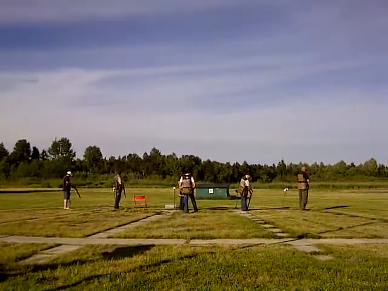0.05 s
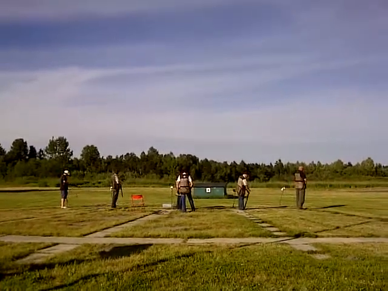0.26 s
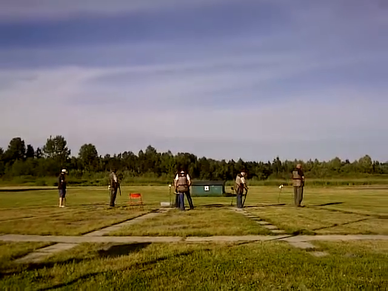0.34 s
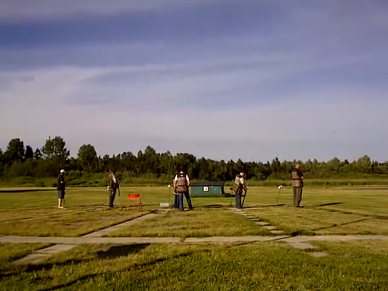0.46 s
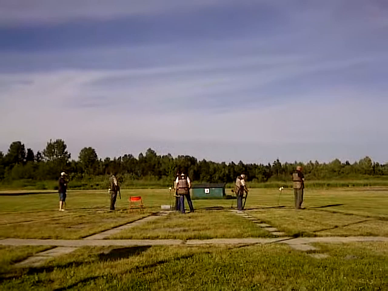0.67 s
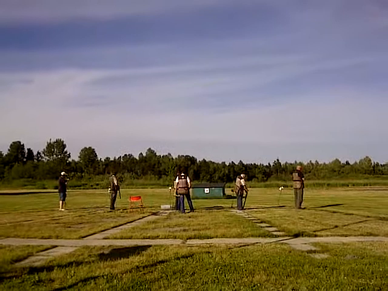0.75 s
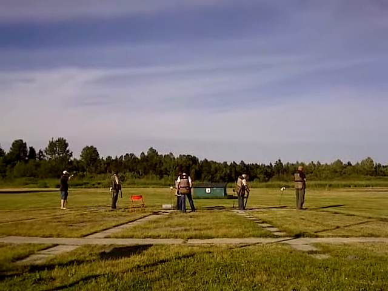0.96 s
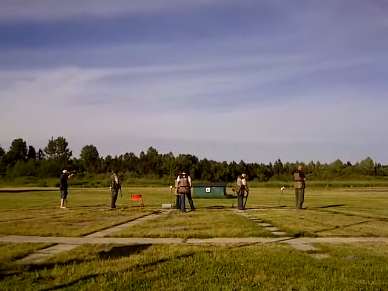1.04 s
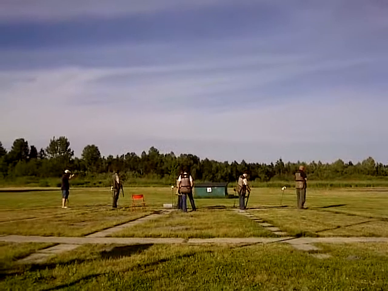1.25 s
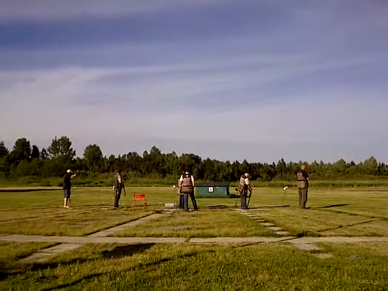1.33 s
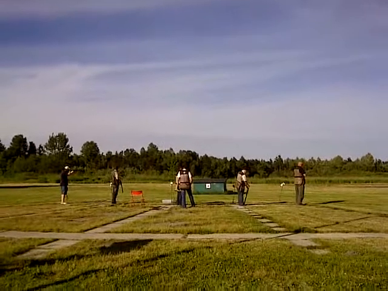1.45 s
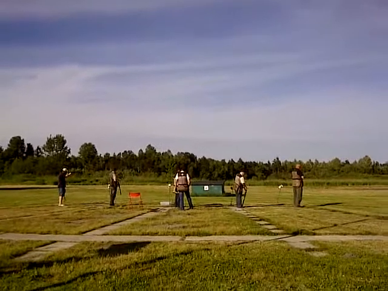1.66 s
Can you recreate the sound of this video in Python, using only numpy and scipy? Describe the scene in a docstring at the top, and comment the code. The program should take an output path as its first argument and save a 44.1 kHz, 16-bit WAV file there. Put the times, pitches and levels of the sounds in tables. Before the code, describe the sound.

One shotgun shot on an open outdoor range is the main sound. Light wind hisses throughout, with three small, dull knocks close by at about 0.2, 0.4 and 0.6 seconds. At 0.8 seconds the short, hard blast briefly overloads the microphone. A crackling echo rolls back from the field and trees, fading by about 1.5 seconds. A few more small knocks come between 1.3 and 1.6 seconds.

```python
"""One shotgun shot on an open, grassy range: a short, hard blast that overloads a small microphone.
Single surfaces return slaps; dense tiny echoes form a crackling roll, first from the field,
then from the tree line. A few small, damped knocks sound close by. Light wind hisses in the trees."""
import sys
import numpy as np
from scipy.fft import rfft, irfft
from scipy.io import wavfile
from scipy.ndimage import map_coordinates

SR = 44100
rng = np.random.default_rng(int(sys.argv[2]) if len(sys.argv) > 2 else 0)


def int16_out(signal):
    """Quantize to a 16-bit WAV file."""
    q = np.round(np.clip(np.atleast_2d(signal).T, -1, 1) * 32767)
    wavfile.write(sys.argv[1], SR, q.astype(np.int16))


N = 74970

# Muzzle blast spectrum. Each row: frequency in Hz, gain in dB.
BLAST_SPECTRUM = [(25, -7), (60, -17), (120, -3), (210, 2), (470, -5.5), (760, 3.5), (1030, -1),
                  (1340, 2.5), (1680, -10), (2050, -6), (2280, 1.5), (2500, 2), (2850, -18.5),
                  (3200, -14.5), (3650, -8), (4200, -15.5), (4650, -24.5), (5200, -10.5), (5800, -23),
                  (7800, -25.5), (9000, -37.5)]
# Paths via the ground and the stand. Each row: delay in seconds, gain in dB.
BOUNCE_PATHS = [(.00128, -15.5), (.0021, -19)]
# Single echoes. Each row: start in seconds, gain in dB, low-pass corner in Hz.
SLAPS = [(0.8196, -2, 8000), (0.828, 2, 4940), (.834, -1.5, 5000), (0.8524, 4.5, 3600), (.874, 4, 3200),
         (.891, 7, 4800), (.908, 5, 2480), (.951, 3, 4000), (1.004, 5.5, 2200), (1.021, 3.5, 3400),
         (1.058, 0.5, 4880), (1.0929, 1.5, 2500), (1.1717, 10, 1300), (1.296, 0.5, 1500)]
# Spectrum of a single echo. Each row: frequency in Hz, gain in dB.
SLAP_SPECTRUM = [(60, -26.5), (300, -13), (700, -4.5), (1250, 6), (1900, -17.5), (2520, -2), (3200, -15),
                 (5200, -20), (6900, -26.5), (7900, -60.5)]
# Field scatter envelope. Each row: time in seconds, level in dB.
FIELD_ENVELOPE = [(.809, -61.5), (.815, -40.5), (.832, -32.5), (.848, -46), (.872, -33.5), (.9, -33),
                  (.94, -34), (.995, -38), (1.015, -41), (1.05, -45), (1.2, -52.5)]
# Field scatter spectrum. Each row: frequency in Hz, gain in dB.
FIELD_SPECTRUM = [(100, -28), (300, -8), (528, -8), (667, -6.5), (879, -2.5), (1370, 0.5), (2010, -10.5),
                  (2540, -4.5), (3050, -15), (3600, -18.5), (4400, -26), (5100, -22), (6470, -31.5),
                  (7100, -35), (7800, -78.5)]
# Tree line scatter envelope, before air loss. Each row: time in seconds, level in dB.
TREE_ENVELOPE = [(1.045, -65.5), (1.058, -35), (1.085, -41.5), (1.1, -34), (1.15, -35), (1.22, -39.5),
                 (1.29, -37.5), (1.35, -37), (1.42, -43.5), (1.46, -40.5), (1.52, -50), (1.7, -53.5)]
# Tree line scatter spectrum. Each row: frequency in Hz, gain in dB.
TREE_SPECTRUM = [(50, -22), (125, -7.5), (280, -19), (420, -13), (711, -2.5), (842, -3), (1120, 0),
                 (1970, -9.5), (2440, -4.5), (3010, -17.5), (5340, -23.5), (6800, -37.5), (7700, -74.5)]
# Ground roll envelope. Each row: time in seconds, level in dB.
ROLL_ENVELOPE = [(.81, -61.5), (.818, -47.5), (.845, -46.5), (.856, -34.5), (.885, -39), (.915, -37),
                 (.95, -40.5), (.975, -31.5), (1.0, -45), (1.06, -54.5), (1.2, -58.5), (1.7, -63.5)]
# Ground roll spectrum. Each row: frequency in Hz, gain in dB.
ROLL_SPECTRUM = [(30, -46.5), (55, -21.5), (90, -4.5), (140, 6.5), (220, 4.5), (340, -5.5), (500, -24),
                 (1000, -68)]
# Close knocks. Each row: start in seconds, gain in dB, pitch in Hz, rise and T60 in seconds,
# overtone, thud and click gains in dB, click centre in Hz.
CLOSE_KNOCKS = [(.2167, -13, 367, 0.00016, .015, -6, -16.5, -18.5, 1900),
                (0.38, -49.5, 1300, 0.0012, .005, -10, -26, 6, 4900),
                (.4160, -3, 660, 0.0011, 0.012, -28, -23, -26, 3230),
                (0.4218, -27, 1220, 0.00069, 0.012, -10, -33, -7.5, 4900),
                (.6068, -2, 1323, 0.001, 0.0049, -35, -47, -20.5, 3620),
                (1.3324, -5, 847, 0.00097, 0.0063, -16, -53, -20.5, 2520),
                (1.4011, 3, 1188, 0.0023, 0.0092, -11.5, -31, -30.5, 5570),
                (1.4485, -8, 830, 0.00084, 0.0068, -27, -39, -38, 2410),
                (1.4527, -19, 1460, 0.0012, 0.013, -15, -23.5, -20, 2780),
                (1.4882, -23.5, 373, 0.00025, 0.017, -6, -20.5, -19.5, 1510),
                (1.5555, -28.5, 2270, 0.00095, 0.0096, -33, -20, -20, 2270)]
# Spectrum of a knock's click, before its resonance. Each row: frequency in Hz, gain in dB.
CLICK_SPECTRUM = [(200, -4), (1200, 18), (3300, -8.5), (5500, -15.5), (6900, -17), (7500, -43.5),
                  (8200, -81)]
# Wind envelope. Each row: time in seconds, level in dB.
WIND_ENVELOPE = [(0, -41.5), (.08, -44), (.25, -46), (.36, -47.5), (.6, -48), (.8, -48.5), (1.4, -44),
                 (1.58, -46), (1.7, -42.5)]
# Wind spectrum. Each row: frequency in Hz, gain in dB.
WIND_SPECTRUM = [(25, -22), (55, -10.5), (90, -7.5), (160, -16.5), (230, -18.5), (330, -10.5), (520, -10.5),
                 (800, -0.5), (1030, 2.5), (1220, -1.5), (1710, -13), (2390, -18.5), (2970, -35.5),
                 (4500, -45.5), (6900, -49.5), (8000, -77)]
# Treble roll-off of the camera. Each row: frequency in Hz, gain in dB.
CAMERA_RESPONSE = [(7800, -0.5), (9200, -17), (16000, -17)]

SHOT_S, SHOT_GAIN_DB, BASS_LAG_S = 0.8089, 21, 0.001177
AIR_CORNER_HZ, AIR_LOSS_DB_PER_S = 2500, 40
SCATTER_PER_S, SCATTER_SPREAD_DB, WASH_DB = 1100, 2.5, -2
OVERTONE_RATIO, THUD_HZ, THUD_T60_S, CLICK_T60_S, CLICK_Q = 1.83, 172.8, 0.025, 0.015, 3.66
CONTACT_CORNER_HZ, BASS_CORNER_RATIO = 6000, 0.3
FLUTTER_DB, FLUTTER_PER_S = 1, 50
OVERLOAD_LEVEL, BAND_LIMIT_HZ = 0.7, 16400


def muzzle_blast():
    """Direct pulse plus two bounces within a few milliseconds."""
    paths = [(0.0008, 0.0067)] + BOUNCE_PATHS  # direct path first
    return sum(amp(SHOT_GAIN_DB + db) * pulse(SHOT_S + delay_s, lambda hz: gain_at(BLAST_SPECTRUM, hz))
               for delay_s, db in paths)


def slap_echoes():
    """One low-passed pulse from each reflecting surface."""
    out = np.zeros(N)
    for start_s, db, corner_hz in SLAPS:
        response = lambda hz: gain_at(SLAP_SPECTRUM, hz) / np.hypot(1, (hz / corner_hz) ** 2)
        out += amp(db) * pulse(start_s, response)
    return out


def field_scatter():
    """Early crackle off the field and its low trap house."""
    return envelope(FIELD_ENVELOPE) * scatter(FIELD_SPECTRUM)


def tree_scatter():
    """Late crackle off the tree line; longer paths lose more treble to the air."""
    crackle = scatter(TREE_SPECTRUM)
    low = filtered(crackle, lambda hz: 1 / (1 + (hz / AIR_CORNER_HZ) ** 4))
    onset_s = TREE_ENVELOPE[1][0]
    treble = (crackle - low) * amp(-AIR_LOSS_DB_PER_S * since(onset_s))
    return envelope(TREE_ENVELOPE) * (low + treble)


def ground_roll():
    """Low roll of the blast over the ground."""
    return envelope(ROLL_ENVELOPE) * scatter(ROLL_SPECTRUM)


def knocks():
    """Each knock: a heavily damped ring with one overtone, a soft thud, a noise click."""
    out = np.zeros(N)
    for start_s, db, pitch_hz, rise_s, t60_s, overtone_db, thud_db, click_db, click_hz in CLOSE_KNOCKS:
        t = since(start_s)
        phase = 2 * np.pi * pitch_hz * t
        modes = np.sin(phase) + amp(overtone_db) * np.sin(OVERTONE_RATIO * phase)
        attack = 1 - np.exp(-t / rise_s)
        ring = radiated(modes * attack * decay(t, t60_s), pitch_hz)
        thud = radiated(np.sin(2 * np.pi * THUD_HZ * t) * decay(t, THUD_T60_S), THUD_HZ)
        burst = rng.standard_normal(N) * decay(t, CLICK_T60_S)
        resonance = lambda hz: hz / np.hypot(hz, CLICK_Q * (hz ** 2 - click_hz ** 2) / click_hz)
        click = 2 * filtered(burst, lambda hz: gain_at(CLICK_SPECTRUM, hz) * resonance(hz))
        out += amp(db) * (ring + amp(thud_db) * thud + amp(click_db) * click)
    return out


def wind():
    """Light, fluttering rush from the distant trees."""
    flutter = map_coordinates(rng.standard_normal(N), [since(0) * FLUTTER_PER_S])
    rush = unit_rms(filtered(rng.standard_normal(N), lambda hz: gain_at(WIND_SPECTRUM, hz)))
    return envelope(WIND_ENVELOPE) * amp(FLUTTER_DB * flutter) * rush


def pulse(start_s, response):
    """Causal pressure pulse with the given magnitude response; the bass lags the treble."""
    hz = np.fft.rfftfreq(2 * N, 1 / SR)
    cepstrum = irfft(np.log(response(hz) + 1e-6))
    cepstrum[1:N] *= 2  # fold to minimum phase
    cepstrum[N + 1:] = 0
    delay_s = start_s + BASS_LAG_S * np.exp(-hz / AIR_CORNER_HZ)
    lag_rad = 2 * np.pi * (np.cumsum(delay_s) - delay_s[0]) * hz[1]
    return irfft(np.exp(rfft(cepstrum) - 1j * lag_rad))[:N]


def scatter(spectrum):
    """Dense tiny echoes of random sign and size over a diffuse wash, rms 1."""
    arrivals = rng.random(N) < SCATTER_PER_S / SR
    signs = np.sign(rng.standard_normal(N))
    sizes = amp(SCATTER_SPREAD_DB * rng.standard_normal(N))
    wash = amp(WASH_DB) * rng.standard_normal(N)
    crackle = unit_rms(arrivals * signs * sizes) + wash
    return unit_rms(filtered(crackle, lambda hz: gain_at(spectrum, hz)))


def radiated(vibration, pitch_hz):
    """A small object radiates little bass; a soft contact excites little treble."""
    high_pass = lambda hz: (1j * hz / (1j * hz + BASS_CORNER_RATIO * pitch_hz)) ** 2
    return filtered(vibration, lambda hz: high_pass(hz) / (1 + (hz / CONTACT_CORNER_HZ) ** 8))


def amp(db):
    return 10 ** (np.asarray(db) / 20)


def unit_rms(x):
    return x / np.sqrt(np.mean(x ** 2) + 1e-20)


def gain_at(spectrum, hz):
    """Gain from (Hz, dB) rows on a log frequency axis."""
    points_hz, db = np.transpose(spectrum)
    return amp(np.interp(np.log(hz + 1), np.log(points_hz + 1), db))


def envelope(rows):
    """Gain per sample from (s, dB) rows."""
    times_s, db = np.transpose(rows)
    return amp(np.interp(np.arange(N) / SR, times_s, db))


def since(start_s):
    """Seconds since the start, zero before it."""
    return np.maximum(np.arange(N) / SR - start_s, 0)


def decay(t, t60_s):
    """Falls 60 dB in t60_s; silent until t > 0."""
    return np.exp(-np.log(1000) * t / t60_s) * (t > 0)


def filtered(x, response):
    """Zero-padded FFT filter; response takes Hz."""
    return irfft(rfft(x, 2 * N) * response(np.fft.rfftfreq(2 * N, 1 / SR)))[:N]


def scene():
    """Shot, echoes, knocks and wind, mono."""
    tail = tree_scatter() + field_scatter() + ground_roll()
    return (muzzle_blast() + slap_echoes() + tail + knocks() + wind())[None]


def record(dry):
    """The microphone saturates on the blast; the camera dulls the treble and limits the band."""
    saturated = dry[0] / (1 + (dry[0] / OVERLOAD_LEVEL) ** 8) ** (1 / 8)
    return filtered(saturated, lambda hz: gain_at(CAMERA_RESPONSE, hz) * (hz < BAND_LIMIT_HZ))[None]


dry = scene()
out = record(dry)
int16_out(out)
```